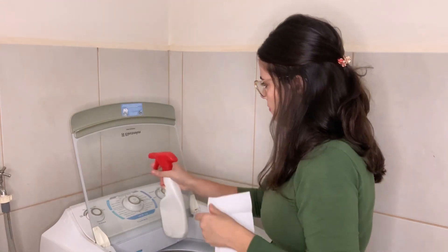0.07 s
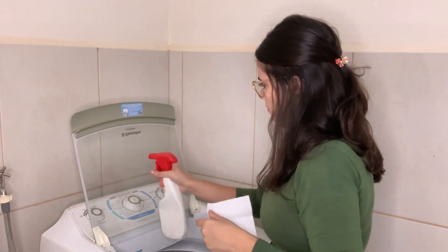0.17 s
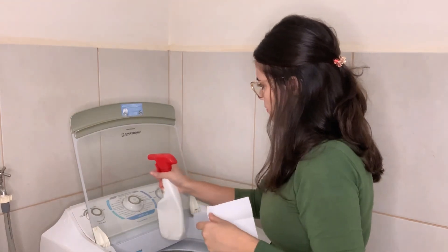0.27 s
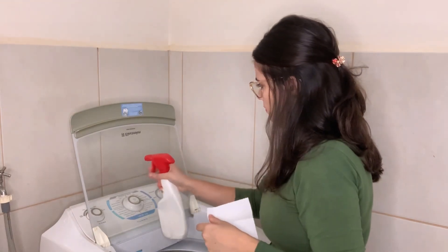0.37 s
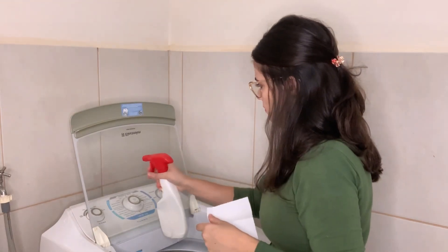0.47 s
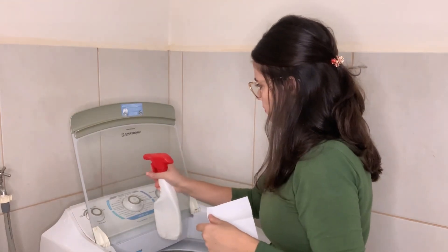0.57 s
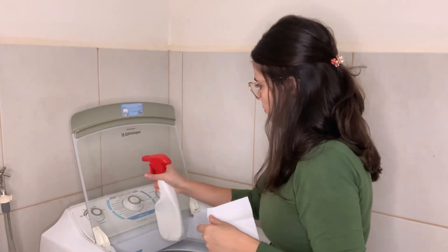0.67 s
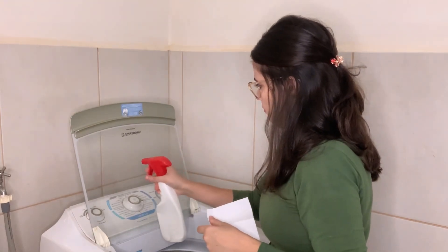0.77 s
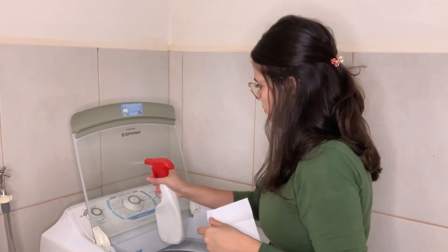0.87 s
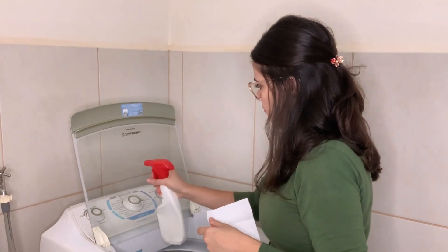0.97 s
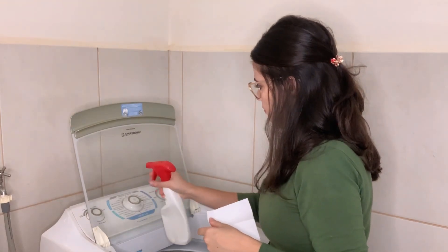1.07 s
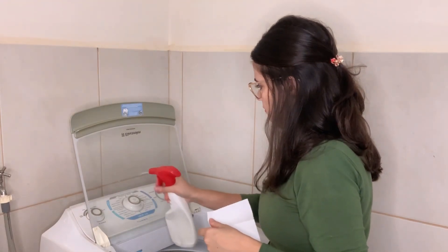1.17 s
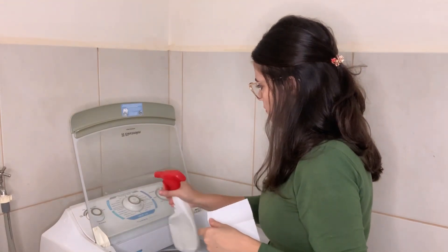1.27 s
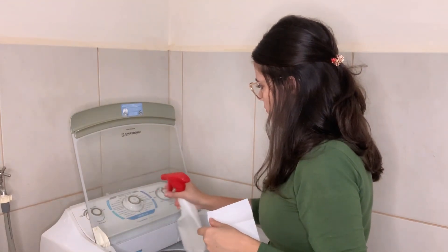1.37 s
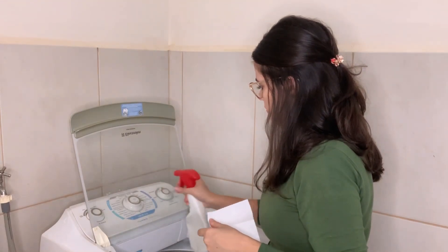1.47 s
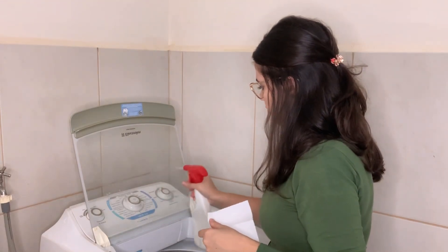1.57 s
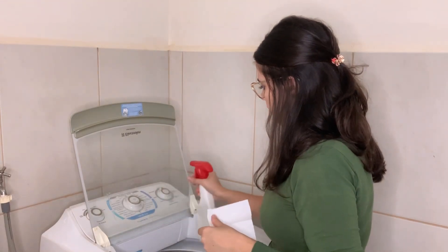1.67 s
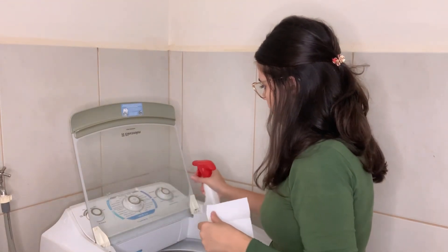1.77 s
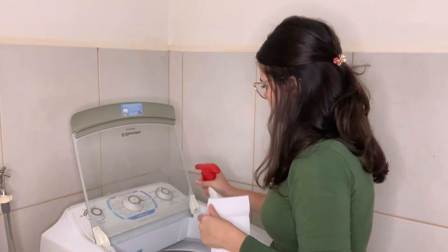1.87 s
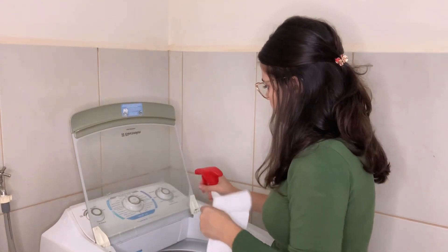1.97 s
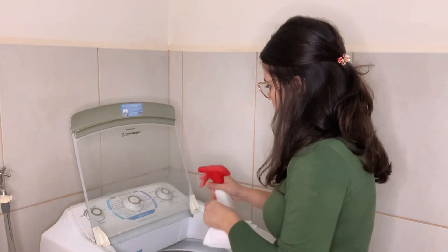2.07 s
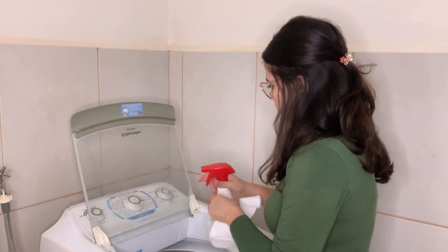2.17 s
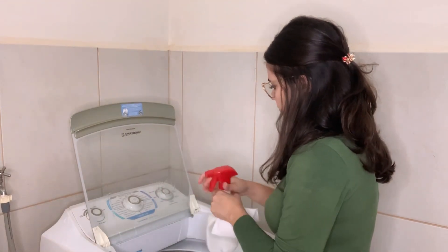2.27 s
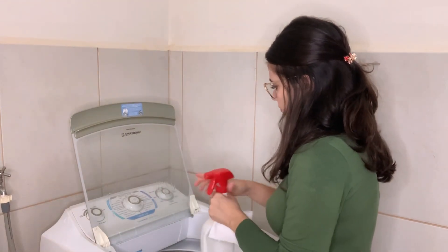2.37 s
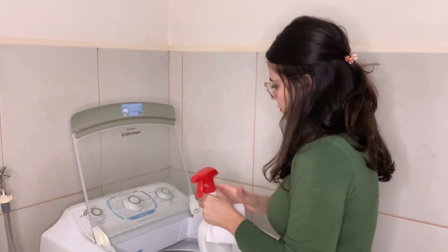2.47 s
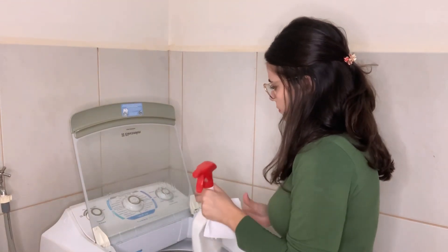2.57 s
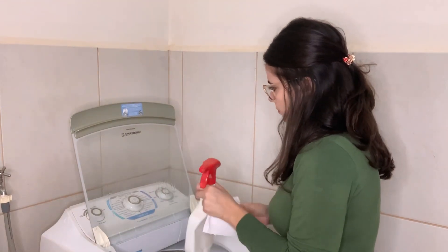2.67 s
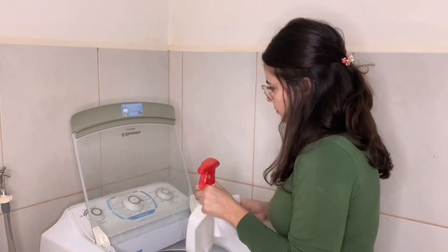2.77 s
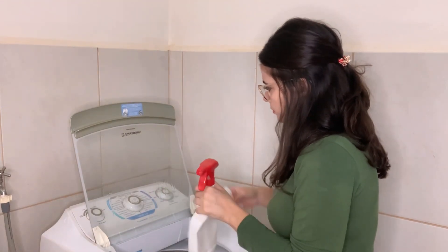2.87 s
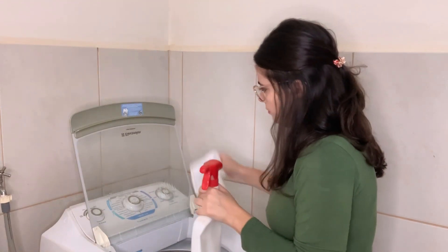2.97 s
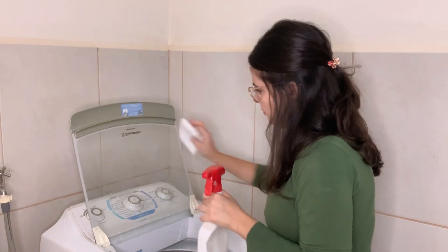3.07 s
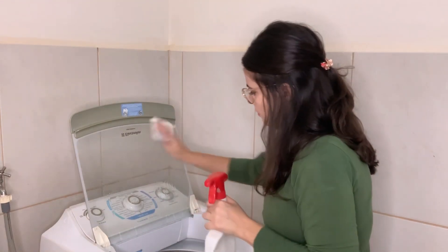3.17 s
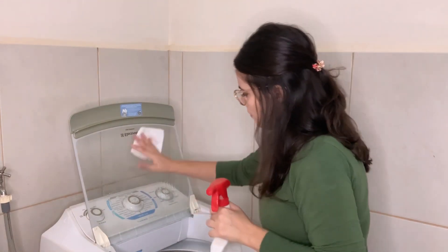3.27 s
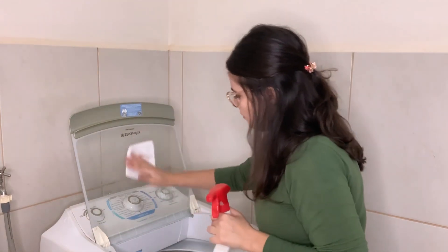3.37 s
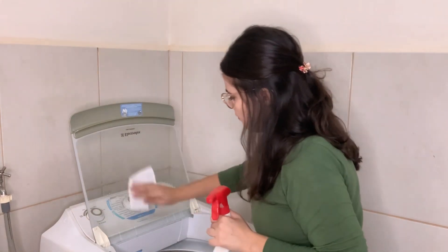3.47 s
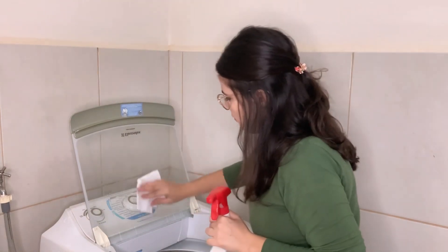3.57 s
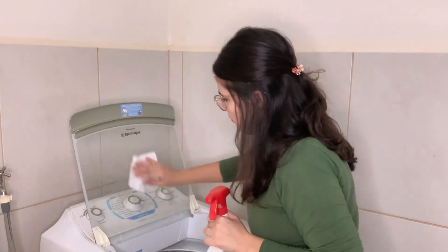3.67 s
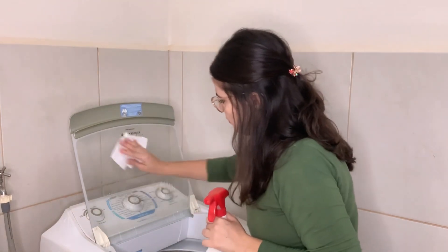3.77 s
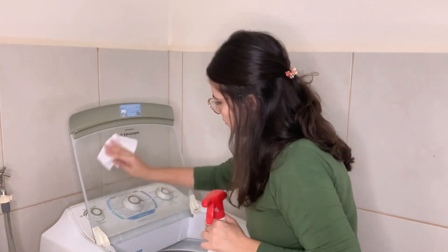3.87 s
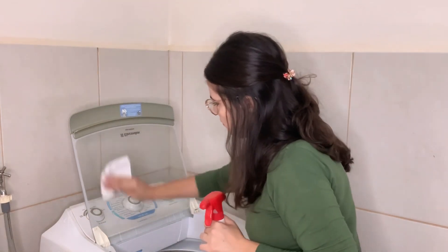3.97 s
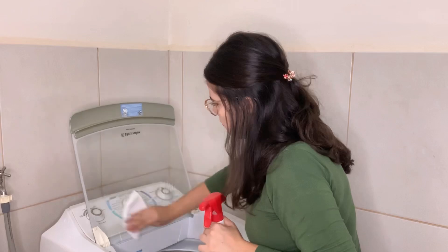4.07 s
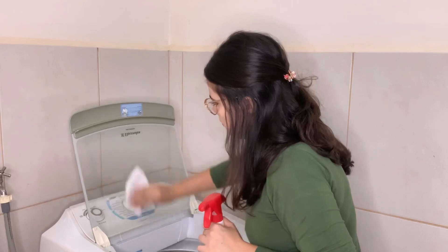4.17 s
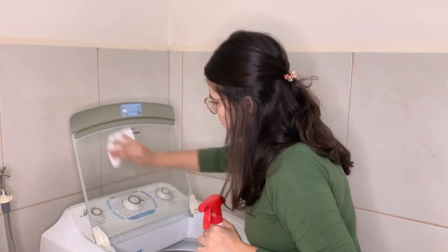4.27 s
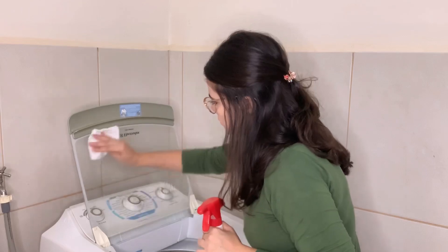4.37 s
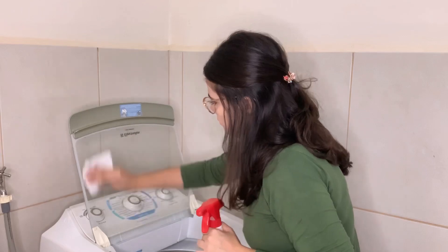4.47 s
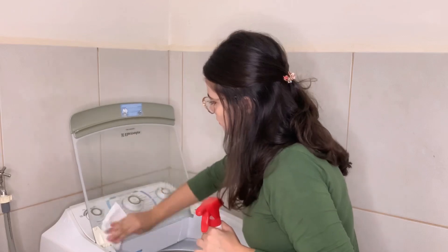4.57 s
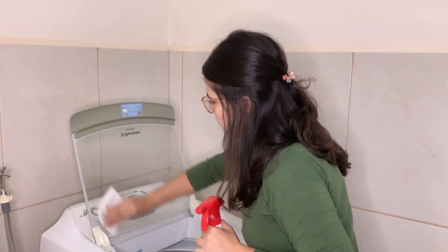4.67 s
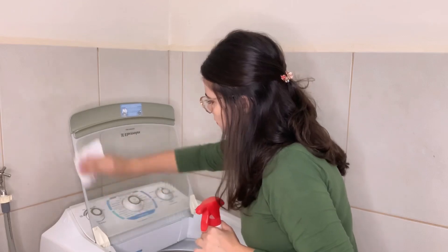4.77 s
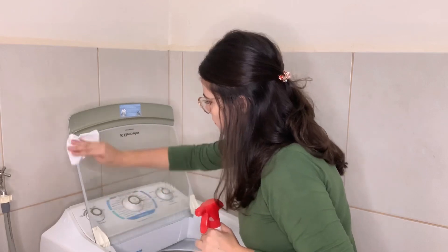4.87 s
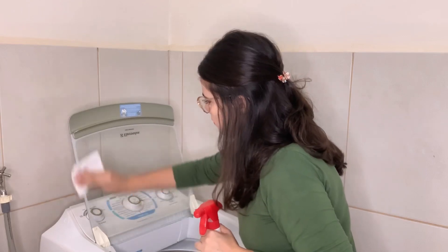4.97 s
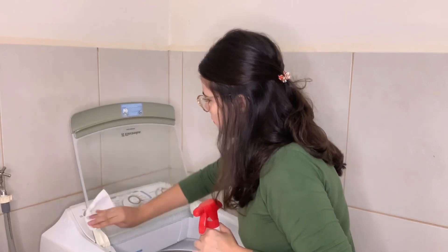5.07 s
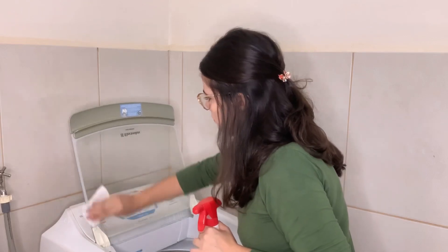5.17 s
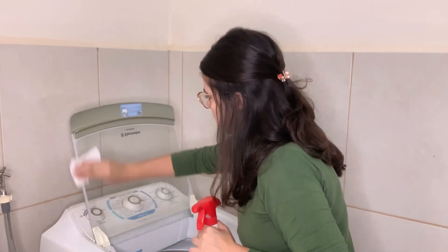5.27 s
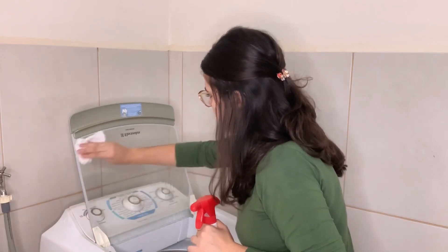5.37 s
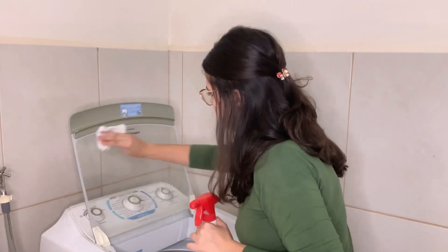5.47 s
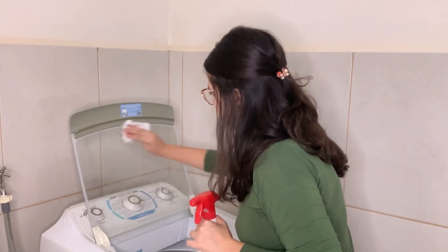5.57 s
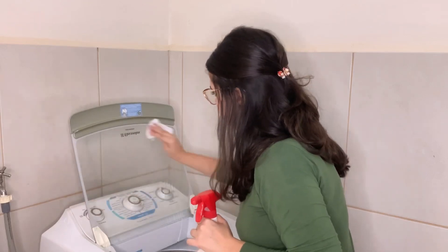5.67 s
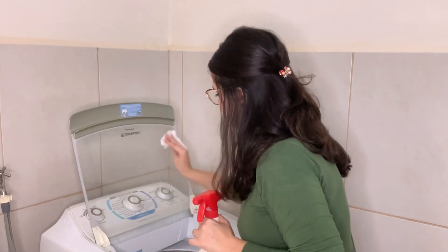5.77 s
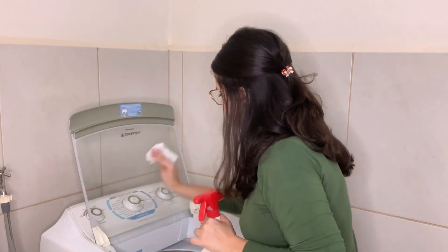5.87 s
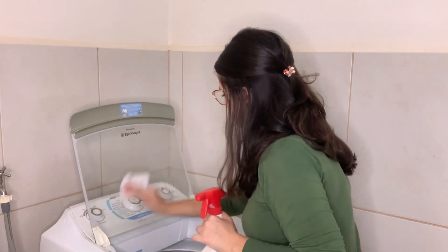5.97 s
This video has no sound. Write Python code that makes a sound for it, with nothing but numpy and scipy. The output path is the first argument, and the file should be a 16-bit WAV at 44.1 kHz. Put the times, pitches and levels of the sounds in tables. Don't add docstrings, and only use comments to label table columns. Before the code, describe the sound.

Wet, hissing spray puffs burst from a plastic nozzle, followed by crisp paper folding and swishing wipes with dull lid thumps in a laundry room.

```python
import sys
import numpy as np
from scipy import signal
from scipy.fft import rfft, irfft, next_fast_len
from scipy.io import wavfile
from scipy.ndimage import uniform_filter1d

SR = 44100
rng = np.random.default_rng(int(sys.argv[2]) if len(sys.argv) > 2 else 0)


def boost_factor(decibels):
    exponent = np.asarray(decibels, float) / 20
    return 10 ** exponent


def bounce(signal):
    frames = np.transpose(np.atleast_2d(signal))
    limited = np.clip(frames, -1, 1)
    pcm = np.round(limited * 32767).astype(np.int16)
    wavfile.write(sys.argv[1], SR, pcm)


N = 265129

# (start [s], build-up [s], hold [s], jet [dB], fizz above jet [dB])
SQUEEZES = [
    (0.513, 0.0061, 0.02, -46, -31),
    (0.839, 0.042, 0.033, -34.5, -5.5),
    (1.127, 0.059, 0.076, -37, -2.5),
    (1.469, 0.043, 0.082, -34.5, -4.5),
    (1.789, 0.053, 0.032, -34, -1.5),
]
# (start [s], build-up [s], hold [s], sizzle [dB], pump gurgle [dB])
MISTS = [
    (.503, .015, .005, -57, -72),
    (0.526, 0.0066, 0.0092, -52, -45),
    (0.527, 0.012, 0.0066, -32, -57),
    (0.822, 0.005, 0.1, -30.5, -41),
    (1.134, 0.02, 0.01, -45, -47.5),
    (1.167, 0.0033, 0.0093, -30, -65),
    (1.19, 0.06, 0.052, -40.5, -44),
    (1.474, 0.065, 0.081, -32, -41.5),
    (1.78, 0.058, 0.094, -32.5, -42),
]
# (time [s], peak [dB], time to fall 60 dB [s])
SPITS = [
    (0.5222, -14, 0.018),
    (0.539, -27, 0.026),
    (0.549, -11.5, 0.03),
    (0.826, -10.5, 0.063),
    (0.8844, -7.5, 0.028),
    (1.2272, -8, 0.024),
    (1.552, -9, 0.014),
    (1.62, -14, .012),
]
# (start [s], build-up [s], hold [s], level [dB], pitch [Hz])
WHISTLES = [(0.52, 0.0028, .006, -38.5, 3360), (0.531, .003, 0.0054, -40.5, 3330),
            (0.54, .003, 0.0047, -45.5, 3230), (0.552, .002, .004, -49, 3260),
            (0.54, .004, 0.021, -53, 1890), (0.555, 0.0055, 0.013, -52, 2440), (0.6, .006, .015, -54, 2980),
            (0.54, .008, .012, -35, 13100), (0.824, .005, 0.011, -47, 3220), (0.867, 0.033, .03, -43, 3280),
            (0.882, .02, 0.044, -44, 2640), (0.885, .02, .03, -43, 4300), (0.87, .008, .012, -39, 12600),
            (1.2, .015, .02, -52, 2660), (1.227, .02, 0.03, -43.5, 3240), (1.172, .004, .015, -36, 12300),
            (1.205, 0.022, .025, -33, 13100), (1.21, 0.01, 0.023, -32.5, 12300),
            (1.452, .008, 0.022, -46, 2070), (1.536, 0.017, 0.026, -49, 4870),
            (1.49, .05, 0.057, -41, 3200), (1.508, 0.027, .06, -39.5, 12600),
            (1.6, 0.012, 0.025, -46, 2220), (1.773, 0.0092, .015, -53, 2030),
            (1.805, 0.022, 0.035, -41, 3200), (1.843, 0.018, 0.022, -46, 3050),
            (1.85, .015, .03, -48, 4420), (1.895, 0.013, 0.016, -51, 2420), (1.798, .02, 0.037, -57, 1690),
            (1.83, 0.027, 0.035, -36.5, 12830), (1.86, .02, .03, -39, 14400)]
# (frequency [Hz], level per Hz [dB])
SPRAY_COLOUR = [(550, -12), (1000, -16.5), (1500, -10), (2200, -7), (3200, -2.5), (4500, -13.5),
                (6500, -16), (8500, -13.5), (10500, -7), (12500, -6.5), (15000, -3)]
# (frequency [Hz], width [Hz], level [dB])
NOZZLE_MODES = [(2673, 100, 1.5), (3305, 194, 6), (3890, 930, 0), (12210, 520, 8), (13100, 440, -5)]
# (time [s], peak [dB], air puff above click [dB], puff
# time to fall 60 dB [s], plastic scrape above click [dB])
CLICKS = [(0.001, -67, -22, 0.31, 18), (0.0186, -27.5, -35, 1, -8.5), (0.189, -44, 0.5, 0.14, -12),
          (0.348, -60, -36, 0.084, 0), (0.368, -29.5, -41, 0.24, -7), (0.3707, -47, -27, .1, -2),
          (0.379, -48.5, -4.5, 0.59, -42), (0.402, -29.5, -6, 0.085, -3), (0.4255, -49, -23, .1, 4),
          (0.6876, -41.5, -7.5, 0.17, 8.5), (0.7036, -41, -1.5, 0.25, 1.5), (0.796, -42, -21, 0.098, -10),
          (1.013, -37, -6, 0.15, 0), (1.173, -45.5, 16, 0.048, 19), (1.454, -58, -21, 0.2, 10),
          (1.4653, -43, -31, 0.4, -11)]
# (frequency [Hz], level [dB], time to fall 60 dB [s])
TRIGGER_MODES = [(1209, -4.5, 0.055), (1597, -1, 0.014), (1870, 3, 0.012), (1960, -10, 0.04),
                 (2560, -7, 0.024), (3700, -40, 0.0071)]

# (time [s], fibre hiss [dB])
FOLDING = [
    (2.09, -71),
    (2.246, -55.5),
    (2.364, -68),
    (2.41, -84),
    (2.54, -101),
    (2.546, -80),
    (2.706, -51),
    (2.862, -51.5),
    (3.01, -74.5),
]
# (time [s], fibre hiss [dB])
WIPING = [
    [(3.02, -59.5), (3.082, -48), (3.168, -56), (3.21, -47.5), (3.71, -54.5), (3.8, -52)],
    [(3.81, -49), (3.876, -42), (4.066, -56), (4.218, -47.5), (4.59, -52), (4.65, -59)],
    [(4.66, -53), (4.822, -46.5), (4.846, -53.5), (5.144, -52.5), (5.256, -48), (5.38, -55)],
    [(5.39, -56), (5.61, -44), (5.88, -51), (5.976, -61.5), (6.01, -59)],
]
# (time [s], peak [dB], time to fall 60 dB [s], bright edge above peak [dB])
CATCHES = [(2.146, -35, 0.054, -1.5), (2.225, -35.5, 0.081, -12), (2.545, -42.5, 0.14, 1),
           (2.607, -31, 0.085, -3), (3.031, -54, 0.047, -1), (3.095, -51, 0.023, -9),
           (3.182, -36, 0.033, -8), (3.4294, -54, 0.05, -9), (3.51, -36, .05, 0), (3.8374, -60, 0.049, -22),
           (4.54, -30, 0.064, -3), (4.8179, -35, 0.053, -3), (5.0343, -27, 0.032, 1),
           (5.124, -35, 0.11, -15), (5.2244, -45, 0.07, 3)]
# (time [s], width [s], rub [dB], dull body above rub [dB])
PRESSES = [(2.15, 0.033, -66.5, 2), (2.24, 0.072, -62, 2.5), (2.35, 0.021, -55, -10),
           (2.458, 0.027, -57, -5), (2.562, 0.013, -51, -2), (2.62, 0.015, -58.5, 6),
           (2.714, 0.041, -46, -7.5), (2.85, 0.047, -63, 7.5), (2.96, 0.025, -55, -5),
           (3.087, 0.032, -43.5, -15), (3.203, 0.032, -44.5, -6), (3.45, 0.03, -62, -1),
           (3.55, 0.065, -53.5, -4.5), (3.64, 0.032, -54.5, -3), (3.75, 0.023, -56, -38),
           (3.892, 0.047, -39.5, -18), (4.12, 0.19, -70.5, 11.5), (4.24, 0.11, -47.5, -29),
           (4.555, 0.018, -51, -8), (4.61, 0.08, -55.5, -6), (4.826, 0.007, -44, -10),
           (4.9, 0.048, -55, 0.5), (5.055, 0.023, -50, -5), (5.22, 0.074, -51.5, -3.5),
           (5.49, 0.052, -47.5, -21), (5.6, 0.04, -50.5, -50), (5.72, 0.061, -56.5, -36),
           (5.83, 0.041, -45.5, -10.5), (6.0, 0.013, -55, -2)]
# (time [s], width [s], share taken [dB])
THIN_RUBS = [
    (2.0, 0.04, -8),
    (3.33, 0.045, -4),
    (3.55, 0.048, -13),
    (4.2, 0.055, -8.5),
    (4.36, .07, -12),
    (4.7, .05, -15),
    (5.2, .04, -23),
    (5.7, 0.054, -6),
    (5.83, .04, -5),
]
# (time [s], width [s], level [dB], pitch [Hz])
SQUEAKS = [(2.705, 0.0051, -50, 1950), (2.74, 0.0043, -53, 1760), (2.82, .006, -45, 1680),
           (2.815, .012, -54, 4470), (3.86, 0.01, -56, 4300), (3.92, 0.013, -46, 2500),
           (3.91, 0.0099, -57, 4140), (4.02, 0.012, -46, 3800), (4.25, 0.017, -50, 3200),
           (3.093, 0.005, -39, 3040), (3.104, .005, -42, 2500), (3.1, 0.013, -54, 4420),
           (3.09, 0.012, -52, 1600), (3.182, .005, -54, 1700), (3.215, .015, -48, 4600),
           (3.225, 0.011, -51, 1500), (3.428, .01, -48, 2940), (3.468, .008, -60, 2920),
           (3.28, .005, -50, 3900), (3.513, .01, -46, 2920), (4.542, 0.0039, -49, 1520),
           (4.56, .01, -42, 1800), (4.565, 0.011, -51, 4370), (4.62, .015, -56, 1670),
           (4.825, .008, -52, 5300), (4.835, .006, -54, 1000), (5.2, 0.019, -54, 3270),
           (5.25, 0.01, -59, 3670), (5.045, 0.0087, -52, 1610), (5.05, 0.0074, -43.5, 2850),
           (5.385, .015, -53, 1580), (5.48, 0.017, -46, 1920), (5.55, .03, -52, 2150),
           (5.56, .03, -49, 4430), (5.6, 0.013, -52, 1470), (5.61, 0.023, -47, 2600),
           (5.82, 0.018, -49, 2950), (5.85, 0.012, -49, 3820), (5.9, .015, -53.5, 1320)]
# (frequency [Hz], level per Hz [dB])
PAPER_COLOUR = [(300, 6), (600, 6), (1000, 4), (1500, 0), (2200, -3.5), (3200, -1.5), (4500, -3),
                (6500, -3), (8500, 16), (10500, 8.5), (12500, 5.5), (15000, 4.5)]

# (frequency [Hz], width [Hz], level [dB])
LID_LOWEST = [(86.6, 19.1, 0)]
# (frequency [Hz], width [Hz], level [dB])
LID_MIDDLE = [(120.5, 13, 2), (158.4, 32.7, 0.5)]
# (frequency [Hz], width [Hz], level [dB])
FRAME_MODES = [(199.2, 37, -4), (258, 15, -0.5), (314.4, 25, -4), (435.7, 22, -5.5), (509, 30, -5.5)]
# (time [s], middle modes [dB])
LEANING = [(0, -63), (.25, -61), (1.1, -57), (1.5, -52.5), (2.3, -49), (3.0, -56), (3.4, -57),
           (3.95, -48.5), (4.25, -55.5), (4.6, -45), (5.4, -53.5), (6.01, -51.5)]
# (time [s], width [s], lowest mode [dB], frame modes [dB])
PUSHES = [(0.5, 0.1, -60, -76), (0.87, 0.019, -55, -62), (0.12, 0.11, -67, -74), (1.001, 0.035, -68, -59.5),
          (1.3, 0.096, -78, -64.5), (1.65, 0.21, -62, -62), (1.98, 0.077, -75, -61),
          (2.2, 0.041, -52, -59.5), (2.42, 0.046, -60, -74), (2.68, 0.13, -53, -57.5),
          (2.89, 0.043, -49.5, -65.5), (3.2, 0.064, -51, -56.5), (3.32, 0.12, -61, -80),
          (3.52, 0.071, -53, -65), (3.68, 0.044, -49.5, -64), (3.9, 0.1, -50, -57),
          (4.14, 0.089, -54.5, -62.5), (4.38, 0.057, -45, -64.5), (4.62, 0.088, -43.5, -54.5),
          (4.76, 0.016, -56, -82), (4.89, 0.062, -40, -49.5), (5.12, 0.038, -39, -60),
          (5.2, 0.023, -70, -53), (5.3, 0.045, -39, -53), (5.41, 0.037, -40.5, -57.5),
          (5.58, 0.14, -51.5, -75), (5.87, 0.09, -70, -60), (5.999, 0.012, -70, -57)]
# (time [s], peak [dB])
KNOCKS = [
    (3.819, -65),
    (4.491, -44),
    (4.549, -46),
    (4.826, -44),
    (4.849, -45),
    (4.882, -40),
    (5.049, -43),
    (5.986, -48),
]
# (time [s], peak [dB], pitch [Hz], time to fall 60 dB [s])
THUMPS = [(1.0, -49, 255, 0.16), (2.45, -49, 487, 0.17), (2.683, -37, 503, 0.066),
          (2.955, -44.5, 495, 0.12), (3.075, -44, 506, 0.086), (4.11, -44, 462, 0.14),
          (4.485, -43.5, 480, .08), (4.556, -44, 264, 0.18), (4.609, -42, 342, .1),
          (4.832, -36, 760, 0.038), (4.841, -35, 238, 0.082), (4.85, -41, 336, .12),
          (4.855, -32.5, 87.7, 0.41), (4.871, -38, 252, 0.1), (4.902, -31.5, 174, 0.068),
          (5.05, -45, 258, 0.44), (5.84, -52, 257, 0.29), (5.984, -44, 487, .1)]

# (frequency [Hz], share [0 to 1])
COMMON = [(30, .85), (80, .95), (150, .89), (300, .55), (650, .08), (1600, .25), (5000, .22), (6800, .6),
          (7500, .9), (7800, .98), (10100, .98), (10900, .7), (13400, .96)]
# (frequency [Hz], phase [radians])
LEAD = [(3000, 0.19), (6000, 1.73), (7400, 2.1), (7800, 2.4), (8400, 3), (10000, 3.42), (10500, 3.9),
        (11400, 4.65), (13200, 6.6), (16000, 6.4)]
# (frequency [Hz], level [dB])
BALANCE = [(100, 1.6), (300, -.4), (1400, -2), (4000, -.5), (9000, 0)]
# (frequency [Hz], time to fall 60 dB [s])
ROOM_T60 = [(200, 0.55), (1500, 0.77), (3500, 0.32), (7000, 0.65), (14000, 0.026)]
# (frequency [Hz], level per Hz [dB])
HISS_COLOUR = [(100, -17), (300, 1.5), (600, 3.5), (850, -1), (1500, -6.5), (4500, -12.5), (15000, -20)]

JET_FALL_DB_S, MIST_FALL_DB_S, GURGLE_FALL_DB_S = 365, 222, 131
DRIBBLE_DB, DRIBBLE_FALL_DB_S = -19.5, 38
MIST_IN_JET_DB, MIST_IN_FIZZ_DB = -23, -21.5
JET_IN_MIST_DB = -33
GURGLE_LEAD_S, GURGLE_RISE_S = 0.011, 0.0092
GURGLE_EASE = 0.2
WHISTLE_SHARPNESS, HOLLOW_SHARPNESS = 9, 6
TICK_DB = -4
RUB_DB, RUB_FOLLOWS, MEAN_HISS_DB = -50.5, 0.79, -53
BODY_DB, EASE_OFF = -70, 1.205
FLUTTER_DB, FLUTTER_HZ = 0.7, 25
LOWEST_DB, FRAME_DB = -13.5, -78.5
RUMBLE_DB, RUMBLE_FOLLOWS, PUSH_IN_RUMBLE_DB = -59.5, 0.31, -30
CORNER_T60_S, CORNER_DB = 0.07, 11
HISS_DB = -66.5


def spray():
    drops = grains(3000, spread_db=-9.0, share=0.57)
    mist = coloured(drops + boost_factor(1.5) * resonate(drops, NOZZLE_MODES), SPRAY_COLOUR)
    gurgle = rms_one(band(mist, 450, 2200))
    jet = patchy(mist, 2200, 4500, patchy_db=2.5, count=4)
    fizz = rms_one(band(mist, 4500, 7500))
    sizzle = rms_one(band(mist, 7500, 19000))

    air = squeezes([row[:4] for row in MISTS], MIST_FALL_DB_S)
    flow = dribbling([row[:4] for row in SQUEEZES])
    froth = dribbling([(*row[:3], row[3] + row[4]) for row in SQUEEZES])
    strokes = []
    for s, rise, hold, _, gurgle_db in MISTS:
        pump_rise = GURGLE_RISE_S + GURGLE_EASE * rise
        strokes.append((s - GURGLE_LEAD_S, pump_rise, (1 - GURGLE_EASE) * rise + hold, gurgle_db))
    pump = squeezes(strokes, GURGLE_FALL_DB_S)

    out = (flow + boost_factor(MIST_IN_JET_DB) * air) * jet - pump * gurgle
    out = out + (froth + boost_factor(MIST_IN_FIZZ_DB) * air) * fizz
    out = out - (air + boost_factor(JET_IN_MIST_DB) * flow) * sizzle
    for *stroke, hz in WHISTLES:
        out = out + squeezes([stroke], JET_FALL_DB_S) * hollow(drops, stroke[0], hz, WHISTLE_SHARPNESS)
    out = out + boost_factor(-17.5) * bursts(SPITS, rise_s=0.00099) * (jet - sizzle)
    return out * boost_factor(1.6 * drift(70))


def dribbling(rows):
    return squeezes(rows, JET_FALL_DB_S) + boost_factor(DRIBBLE_DB) * squeezes(rows, DRIBBLE_FALL_DB_S)


def trigger():
    at = [round(row[0] * SR) for row in CLICKS]
    peaks_db = np.array(CLICKS)[:, 1]
    ringing = np.zeros(N)
    chance = rng.standard_normal((len(CLICKS), len(TRIGGER_MODES)))
    for k, (hz, level_db, t60) in enumerate(TRIGGER_MODES):
        clicks = np.full(N, 1e-18)
        clicks[at] = boost_factor(peaks_db + level_db - 1.0 + 2 * chance[:, k])
        r, w = boost_factor(-60 / (t60 * SR)), 2 * np.pi * hz / SR
        ringing += signal.lfilter([0, np.sin(w)], [1, -2 * r * np.cos(w), r * r], clicks)
    soft = band(ringing, 1000, 4000)

    puffs = bursts([(s, peak_db + puff_db - 5.0, t60) for s, peak_db, puff_db, t60, _ in CLICKS], rise_s=0.00046)
    scrapes = bursts([(s, peak_db + scrape_db - 5.0, 0.08) for s, peak_db, _, _, scrape_db in CLICKS],
                     rise_s=0.00026)
    scrape = rms_one(band(grains(540, spread_db=-0.5, share=0.87), 1070, 3000))
    puff = rms_one(band(rng.standard_normal(N), 2500, 11600))
    ticks = np.zeros(N)
    ticks[at] = boost_factor(peaks_db + TICK_DB)
    return soft + 3 * band(ticks, 1200, 4500) + scrapes * scrape + puffs * puff


def towel():
    hiss_db, = in_time(np.vstack([FOLDING, *WIPING]))
    paper = coloured(grains(1500 * boost_factor(2.8 * drift(23)), spread_db=-1.5, share=0.8), PAPER_COLOUR)
    low = rms_one(band(paper, 280, 1730))
    rub = patchy(paper, 1376, 6724, patchy_db=3.0, count=8)
    rub = rub - np.minimum(swells(THIN_RUBS), 1) * band(rub, 1260, 2540)
    top = rms_one(band(paper, 9100, 22000)) * boost_factor(1.0 * drift(17))

    sliding = boost_factor(RUB_FOLLOWS * (hiss_db - MEAN_HISS_DB))
    pressed = boost_factor(RUB_DB) * sliding + swells([row[:3] for row in PRESSES])
    body = boost_factor(BODY_DB) * sliding
    body = body + swells([(s, width, rub_db + body_db) for s, width, rub_db, body_db in PRESSES])
    out = pressed * rub - body * low + boost_factor(hiss_db + 5.5) * top
    out = out * boost_factor(FLUTTER_DB * drift(FLUTTER_HZ))
    for *grip, hz in SQUEAKS:
        out = out + swells([grip]) * hollow(paper, grip[0], hz, HOLLOW_SHARPNESS)

    dull = bursts([(s, peak_db - 11.0, t60) for s, peak_db, t60, _ in CATCHES], rise_s=0.00043)
    bright = bursts([(s, peak_db + edge_db - 7.5, t60) for s, peak_db, t60, edge_db in CATCHES], rise_s=0.0023)
    return out + dull * rms_one(band(paper, 1200, 2600)) - bright * rms_one(band(paper, 2600, 16000))


def lid():
    lean_db, = in_time(LEANING)
    pushes = rng.standard_normal((4, N))
    lowest, middle, frame = (rms_one(resonate(resonate(push, modes), modes))
                             for push, modes in zip(pushes, (LID_LOWEST, LID_MIDDLE, FRAME_MODES)))
    swing = uniform_filter1d(lowest ** 2, size=SR // 25)
    lowest = rms_one(lowest / np.sqrt(0.15 + swing))

    bumps = bursts([(s, peak_db + 6.5, 0.025) for s, peak_db in KNOCKS], rise_s=0.0012)
    bumps = bumps * (1 + 2 * band(pushes[1], 140, 960))
    knocks = resonate(bumps, LID_MIDDLE + FRAME_MODES) * boost_factor(-12) + band(bumps, 120, 570) * boost_factor(9)

    shoves = swells([row[:3] for row in PUSHES])
    rumbling = boost_factor(RUMBLE_DB + RUMBLE_FOLLOWS * (lean_db - lean_db.mean())) + boost_factor(PUSH_IN_RUMBLE_DB) * shoves
    rumble = rumbling * rms_one(band(band(pushes[3], 30, 68), 30, 68))
    rocking = boost_factor(lean_db + LOWEST_DB) + shoves
    creaking = boost_factor(FRAME_DB) + swells([(s, width, frame_db) for s, width, _, frame_db in PUSHES])
    return rocking * lowest + boost_factor(lean_db - 1.0) * middle + creaking * frame + knocks + rumble


def thumps():
    t = np.arange(N) / SR
    return sum(bursts([(s, peak_db, t60)], rise_s=0.0015) * np.sin(2 * np.pi * hz * (t - s))
               for s, peak_db, hz, t60 in THUMPS)


def quiet_hiss():
    return boost_factor(HISS_DB) * coloured(rng.standard_normal(N), HISS_COLOUR)


def room_and_ports(x):
    size = next_fast_len(N + SR)
    hz, t = np.fft.rfftfreq(size, 1 / SR), np.arange(SR // 2) / SR
    white = rng.standard_normal((2, len(t))) * (t > 0.002)
    corner = boost_factor(CORNER_DB - 60 * t / CORNER_T60_S)
    echo = 0
    for k, low in enumerate(30 * 2.0 ** np.arange(10)):
        tail = boost_factor(-60 * t / at_hz(ROOM_T60, low * np.sqrt(2)))
        echo = echo + (-1) ** k * band(white, low, min(2 * low, 19000)) * (corner + tail)
    walls = rfft(echo, size)
    walls = walls / np.sqrt(uniform_filter1d(np.abs(walls) ** 2, size=round(100 * size / SR)))

    common, sides = at_hz(COMMON, hz), np.array([[0.5], [-0.5]])
    step = np.exp(1j * sides * at_hz(LEAD, hz) * (hz > 1000))
    paths = np.sqrt(common) * step + np.sqrt(1 - common) * walls
    power = np.mean(np.abs(paths) ** 2, axis=0)
    paths = paths / np.sqrt(uniform_filter1d(power, size=round(45 * size / SR)))
    return irfft(rfft(x, size) * paths * boost_factor(sides * at_hz(BALANCE, hz)), size)[:, :N]


def grains(per_s, spread_db, share):
    sizes = boost_factor(spread_db * np.minimum(rng.exponential(1, N), 4)) * rng.choice([-1, 1], N)
    return share * rms_one(sizes * (rng.random(N) < per_s / SR)) + rng.standard_normal(N)


def hollow(x, s, hz, sharpness):
    out, peak = np.zeros(N), [(hz, hz / sharpness, 0)]
    i = max(round((s - 0.15) * SR), 0)
    out[i:i + SR // 2] = rms_one(resonate(resonate(x[i:i + SR // 2], peak), peak))
    return out


def resonate(x, peaks):
    out = 0
    for k, (hz, width, level_db) in enumerate(peaks):
        r = np.exp(-np.pi * width / SR)
        top, bottom = [(1 - r * r) / 2, 0, (r * r - 1) / 2], [1, -2 * r * np.cos(2 * np.pi * hz / SR), r * r]
        out = out + (-1) ** k * boost_factor(level_db) * signal.lfilter(top, bottom, x)
    return out


def patchy(x, low_hz, high_hz, patchy_db, count):
    edges = np.geomspace(low_hz, high_hz, count + 1)
    return rms_one(sum((-1) ** k * band(x, *edges[k:k + 2]) * boost_factor(patchy_db * drift(28.3))
                       for k in range(count)))


def squeezes(rows, fall_db_s):
    t = np.arange(0, N, 8) / SR
    coarse = 0
    for s, rise, hold, level_db in rows:
        fall_db = fall_db_s * np.maximum(t - s - rise - hold, 0)
        coarse = coarse + np.clip((t - s) / rise, 0, 1) * boost_factor(level_db - fall_db)
    return np.interp(np.arange(N) / SR, t, coarse)


def swells(rows):
    t = np.arange(0, N, 32) / SR
    coarse = 0
    for s, width, level_db in rows:
        widths = width * np.where(t > s, EASE_OFF, 1)
        coarse = coarse + boost_factor(level_db) * np.exp(-0.5 * ((t - s) / widths) ** 2)
    return np.interp(np.arange(N) / SR, t, coarse)


def bursts(rows, rise_s):
    out, t = np.zeros(N + SR), np.arange(SR // 2) / SR
    for s, level_db, t60 in rows:
        i = round(s * SR)
        out[i:i + len(t)] += boost_factor(level_db - 60 * t / max(t60, 0.005)) * (1 - np.exp(-t / rise_s))
    return out[:N]


def drift(rate):
    r = np.exp(-80 * np.pi * rate / SR)
    slow = signal.lfilter([1], [1, -2 * r, r * r], rng.standard_normal(N // 40 + 2002))[2000:]
    return np.interp(np.arange(N) / 40, np.arange(len(slow)), rms_one(slow))


def in_time(rows):
    s, first, *rest = np.transpose(rows)
    t = np.arange(N) / SR
    outside = np.maximum(s[0] - t, 0) + np.maximum(t - s[-1], 0)
    return [np.interp(t, s, first) - 2000 * outside] + [np.interp(t, s, c) for c in rest]


def at_hz(points, hz):
    table_hz, values = np.transpose(points)
    return np.interp(np.log(hz + 1), np.log(table_hz), values)


def coloured(x, spectrum):
    size = next_fast_len(N)
    gain = boost_factor(at_hz(spectrum, np.fft.rfftfreq(size, 1 / SR)))
    return rms_one(irfft(rfft(x, size) * gain, size)[:N])


def band(x, low_hz, high_hz):
    return signal.sosfilt(signal.butter(2, [low_hz, high_hz], "band", fs=SR, output="sos"), x)


def rms_one(x):
    return x / np.sqrt(np.mean(x ** 2) + 1e-20)


def scene():
    return room_and_ports(spray() + trigger() + towel() + lid() + thumps() + quiet_hiss())


def top_cut(x):
    return signal.sosfilt(signal.butter(12, 15920, fs=SR, output="sos"), x)


def record(dry):
    mix = signal.sosfilt(signal.cheby2(14, 60, 16100, fs=SR, output="sos"), dry)
    return top_cut(mix)


dry = scene()
out = record(dry)
bounce(out)
```